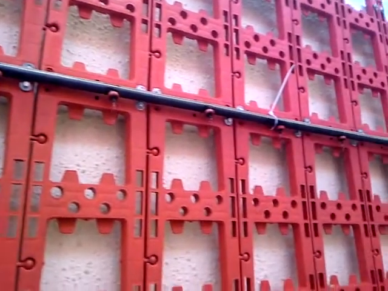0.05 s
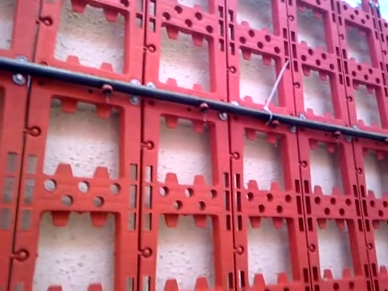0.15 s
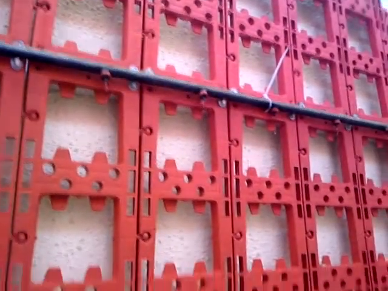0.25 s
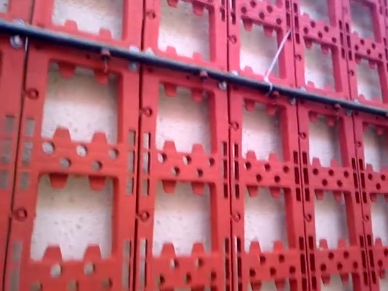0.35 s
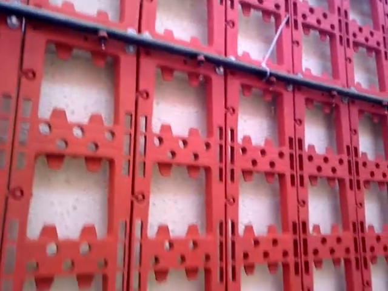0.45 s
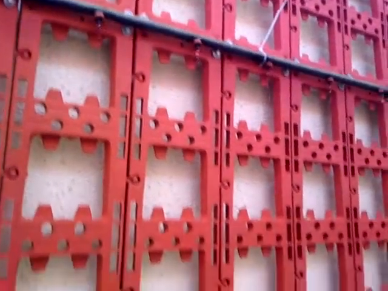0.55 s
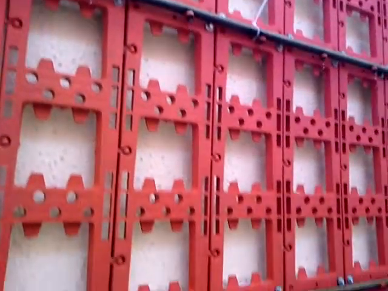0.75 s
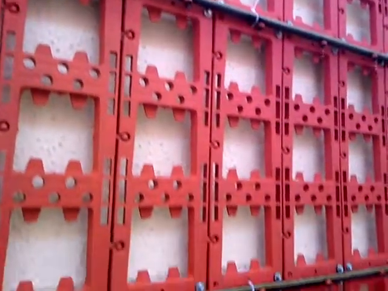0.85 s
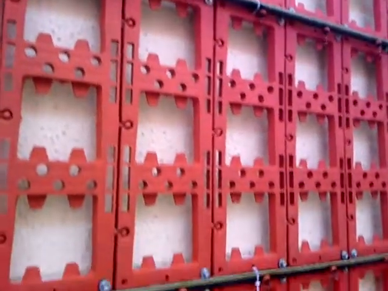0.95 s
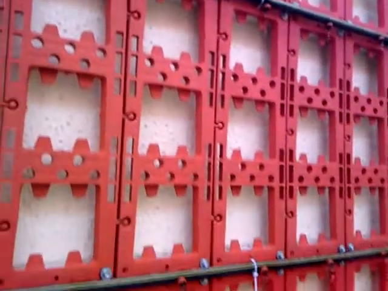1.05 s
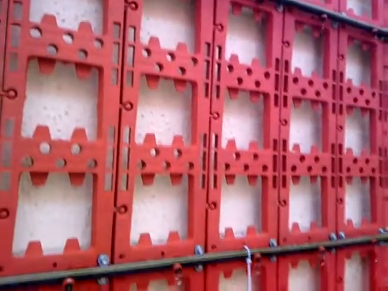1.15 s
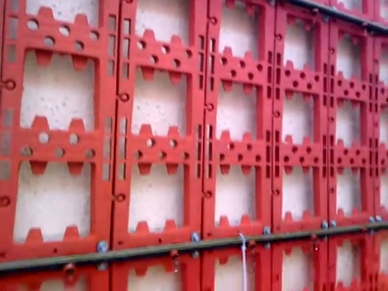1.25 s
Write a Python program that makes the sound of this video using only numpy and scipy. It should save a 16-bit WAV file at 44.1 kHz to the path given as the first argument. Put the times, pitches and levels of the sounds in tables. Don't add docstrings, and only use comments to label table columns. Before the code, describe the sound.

A shoe scrapes across gritty hollow boards from about 0.18 seconds, then heel and sole knock at 0.38 and 0.44, the boards ringing woodily and fading. Tiny dry plastic ticks snap throughout, the sharpest near 0.72. A second crunching drag starts around 0.95, peaks near 1.06 and fades. Faint water hiss and low yard murmur continue underneath, through a thin, dull-topped phone microphone.

```python
import sys
import numpy as np
from scipy import signal
from scipy.fft import rfft, irfft, next_fast_len
from scipy.io import wavfile
from scipy.ndimage import uniform_filter1d, map_coordinates

SR = 44100
rng = np.random.default_rng(int(sys.argv[2]) if len(sys.argv) > 2 else 0)


def output_pcm(signal):
    pcm = np.clip(np.atleast_2d(signal).T, -1, 1) * 32767
    wavfile.write(sys.argv[1], SR, np.round(pcm).astype(np.int16))


def to_linear_factor(level_db):
    exponent = np.asarray(level_db, float) / 20
    return 10 ** exponent


N = 57330

# time_s, level_db
HISS_LEVEL = [(0.0, -50.5), (0.39, -52.5), (0.488, -55), (0.85, -54), (1.172, -67), (1.3, -55.5)]
# freq_hz, density_db
HISS_SPECTRUM = [(880, -7.5), (1500, -8), (1690, -9), (3000, -5.5), (3800, -8), (7600, -6.5), (9880, -20.5),
                 (16700, -120)]
# freq_hz, density_db
YARD_SPECTRUM = [(30, -39.5), (120, -16), (200, -19), (280, -10), (420, -14), (700, -12), (1200, -16),
                 (3000, -27), (6000, -55)]
# time_s, level_db
YARD_LEVEL = [(0, -49), (.17, -49.5), (.62, -50), (.77, -48.5), (.85, -48.5), (.9, -50), (1.3, -49)]

# start_s, peak_db, pitch_hz, t60_s
TICKS = [(0.0561, -37.5, 6900, 0.027), (0.1903, -28.5, 6690, 0.0099), (0.585, -80, 7100, .02),
         (.619, -42, 6000, 0.022), (0.6592, -29, 4900, 0.02), (0.7153, -18, 5850, 0.0079),
         (0.7218, -28.5, 7450, 0.022), (0.738, -44, 6700, 0.037), (0.792, -41.5, 6400, 0.069),
         (0.9456, -31, 7080, 0.011), (1.011, -37.5, 7300, .02), (1.125, -41, 6960, 0.017),
         (1.131, -34.5, 7200, 0.014), (1.2177, -27, 6560, 0.0093), (1.2229, -35, 6700, 0.022),
         (1.228, -47, 6200, 0.026)]
# freq_hz, level_db, t60_share
PLASTIC_MODES = [(3000, -4, .5), (3570, -10, 0.41), (4300, -1.5, .7), (4840, 0, 0.7), (6200, -2, 0.74),
                 (6780, -4.5, 2.7), (7324, -0.5, 1.3), (8500, 2, .6)]
TICK_WIDTH_LOG_HZ, TICK_RISE_S = 0.34, 0.00014
CRACK_DB, TICK_TAIL_DB, TICK_TAIL_T60_S = -5, -15, 0.1

# time_s, weight_db, edge_scrape_db, grit_db
DRAGS = [
    [(.179, -86, -77, -68), (.184, -41, -36.5, -44), (.225, -45.5, -34, -44), (.25, -40, -42.5, -40),
     (.285, -39, -44.5, -41), (.365, -53, -45.5, -42), (.48, -45, -44, -45), (.6, -57.5, -56.5, -58)],
    [(.88, -52.5, -70, -90), (.957, -44, -60, -70), (.965, -39.5, -37.5, -47.5),
     (1.01, -39.5, -40.5, -44.5), (1.06, -33.5, -40.5, -41.5), (1.1, -42, -45.5, -42),
     (1.2, -53, -48.5, -46), (1.3, -54, -54.5, -50.5)],
]
# freq_hz, width_hz, level_db
BOARD_PEAKS = [(247, 120, -1.5), (320, 61, 5), (468, 35.5, -0.5)]
# freq_hz, width_hz, level_db
EDGE_PEAKS = [(597, 145, -1.5), (770, 89, 0.5), (810, 126, 0), (1167, 360, -6.5), (1507, 253, -4.5)]
# freq_hz, density_db
GRIT_SPECTRUM = [(500, -26.5), (1000, -2.5), (1900, -4.5), (2600, -7), (3400, -9.5), (5000, -10),
                 (7600, -15), (12000, -39)]
# center_s, half_length_s, level_db
RASPS = [
    (0.279, .04, -44.5),
    (1.063, 0.047, -50.5),
]
RASP_HZ, RASP_WIDTH_HZ = 2450, 1300
SLIPS_PER_S, SLIP_SPREAD_DB = 2500, 3
GRITS_PER_S, GRIT_SPREAD_DB = 9000, 1

# start_s, ring_db, held_s, held_gain_db, slap_db
KNOCKS = [
    (.3773, -26.5, 0.014, 5.5, 9.5),
    (0.4357, -22, 0.02, 6, -7.5),
]
# freq_hz, heel_db, sole_db, t60_s
HOLLOW_MODES = [(135.7, -22, -22, .6), (183.8, -6, -15, 0.6), (246.8, -2.5, -11.5, 0.8),
                (330.5, -2.5, -1.5, 0.29), (386, -15.5, -6.5, .5), (450.5, -3.5, -3, 0.64),
                (606, -12, -5.5, 0.15), (743, -10.5, -16.5, 0.39), (844, -17, -9.5, 0.075),
                (1044, -20.5, -20.5, 0.26), (1177, -14.5, -20, .07), (1465, -19.5, -22, 0.1)]
# freq_hz, level_db
SLAP_PARTIALS = [(700, -2.5), (980, 2.5), (1300, -3.5), (1550, -11.5)]
KNOCK_RISE_S, LIFT_S, STILL_S, WANDER_RAD = 0.0007, 0.0006, 0.2, 0.9
RATTLE_DB, RATTLE_T60_S, SLAP_T60_S = -7.5, 0.37, 0.014

# freq_hz, gain_db
TREBLE_RESPONSE = [(7500, 1.5), (7800, -4), (8010, -19), (8250, -5.5), (8700, -14), (9050, -26), (9250, -65)]
# freq_hz, chance
DROPOUT_CHANCE = [(2800, 0), (3500, .25), (5000, .35), (6000, .5), (7400, .6), (7700, .85)]
DROPOUT_START_S, DROPOUT_BLOCK_S, DROPOUT_BLOCKS, DROPOUT_BAND_HZ = 0.392, 0.008, 8, 300
CEILING = 0.25
RUMBLE_DB, RUMBLE_HZ = -46, 89


def unit(x):
    return x / np.sqrt(np.mean(x ** 2) + 1e-20)


def along(points, hz):
    f, v = np.transpose(points)
    return np.interp(np.log(hz + 1), np.log(f + 1), v)


def curves(rows, **ends):
    s, *cols = np.transpose(rows)
    return [np.interp(np.arange(N) / SR, s, c, **ends) for c in cols]


def wobble(rate_hz):
    knots = rng.standard_normal(int(N * rate_hz / SR) + 4)
    return map_coordinates(knots, [np.arange(N) * rate_hz / SR])


def filtered(x, response):
    m = next_fast_len(x.shape[-1] + 8192)
    spectrum = rfft(x, m) * response(np.fft.rfftfreq(m, 1 / SR))
    return irfft(spectrum, m)[..., :x.shape[-1]]


def resonances(peaks):
    def response(f):
        total = 0
        for k, (c, w, db) in enumerate(peaks):
            total = total + (-1) ** k * to_linear_factor(db) * 1j * f * w / (c * c - f * f + 1j * f * w)
        return total
    return response


def rush(spectrum, patchy_db):
    z = signal.stft(rng.standard_normal(N + 1024), nperseg=512)[2]
    field = uniform_filter1d(rng.standard_normal(z.shape), 6, 0)
    field = uniform_filter1d(field, 8, 1)
    x = signal.istft(z * to_linear_factor(patchy_db * unit(field)), nperseg=512)[1][:N]
    return unit(filtered(x, lambda hz: to_linear_factor(along(spectrum, hz))))


def grains(rate_hz, spread_db):
    hit, side, size = rng.random((3, N))
    return (hit < rate_hz / SR) * np.sign(side - 0.5) * to_linear_factor(-spread_db * np.log(size + 0.003))


def yard():
    level_db = curves(YARD_LEVEL)[0] + 2.3 * wobble(25)
    return to_linear_factor(level_db) * rush(YARD_SPECTRUM, patchy_db=2.0)


def water():
    level_db = curves(HISS_LEVEL)[0] - 0.72 + 0.46 * wobble(36)
    return to_linear_factor(level_db) * rush(HISS_SPECTRUM, patchy_db=1)


def ticks():
    out, t = np.zeros(N + SR), np.arange(SR // 8) / SR
    for start_s, peak_db, pitch_hz, t60_s in TICKS:
        def near_db(f):
            return -9 * (np.log(f / pitch_hz) / TICK_WIDTH_LOG_HZ) ** 2

        ring = 0
        for hz, db, share in PLASTIC_MODES:
            a, b, c = rng.standard_normal(3)
            level_db = db + near_db(hz) + 1.6 * a - 60 * t / (share * t60_s)
            ring = ring + to_linear_factor(level_db) * np.sin(2 * np.pi * hz * (1 + 0.012 * b) * t + 0.5 * c)
        noise = unit(filtered(rng.standard_normal(len(t)), lambda f: to_linear_factor(near_db(f + 1))))
        crack = to_linear_factor(CRACK_DB - 60 * t / t60_s)
        tail = to_linear_factor(TICK_TAIL_DB - 60 * t / TICK_TAIL_T60_S)
        rise = 1 - np.exp(-t / TICK_RISE_S)
        out[round(start_s * SR):][:len(t)] += to_linear_factor(peak_db - 7.5) * rise * (ring + noise * (crack + tail))
    return out[:N]


def drags():
    slips = grains(SLIPS_PER_S, SLIP_SPREAD_DB)
    wood = unit(filtered(slips, resonances(BOARD_PEAKS)))
    edge = unit(filtered(slips, resonances(EDGE_PEAKS)))
    sand = grains(GRITS_PER_S, GRIT_SPREAD_DB)
    grit = unit(filtered(sand, lambda hz: to_linear_factor(along(GRIT_SPECTRUM, hz))))
    band = resonances([(RASP_HZ, RASP_WIDTH_HZ, 0)])
    rasp = unit(filtered(grains(GRITS_PER_S, GRIT_SPREAD_DB), lambda hz: band(hz) ** 2))

    strokes = np.array([to_linear_factor(curves(rows, left=-120, right=-120)) for rows in DRAGS])
    weight, scrape, crunch = strokes.sum(axis=0)
    t = np.arange(N) / SR
    speed = sum(to_linear_factor(db - 6 * ((t - s) / half_s) ** 2) for s, half_s, db in RASPS)
    rubbing = to_linear_factor(0.79 * wobble(90)) * (weight * wood + scrape * edge)
    return rubbing + to_linear_factor(0.8 * wobble(40)) * (crunch * grit + speed * rasp)


def knocks():
    out, t = np.zeros(N + SR), np.arange(SR // 2) / SR
    for k, (start_s, ring_db, held_s, held_db, slap_db) in enumerate(KNOCKS):
        ring = 0
        for j, mode in enumerate(HOLLOW_MODES):
            hz, mode_db, t60_s = mode[0], mode[1 + k], mode[3]
            drift_rad = WANDER_RAD * np.minimum(t / 0.03, 1) * wobble(35)[:len(t)]
            decay = to_linear_factor(mode_db - 60 * np.maximum(t - held_s / 2, 0) / t60_s)
            ring = ring + (-1) ** j * decay * np.sin(2 * np.pi * hz * t + drift_rad)

        body = resonances([(mode[0], 40, mode[1 + k]) for mode in HOLLOW_MODES])
        rattle = unit(filtered(rng.standard_normal(len(t)), body))
        rattle = to_linear_factor(RATTLE_DB - 60 * t / RATTLE_T60_S) * rattle
        slap = sum(to_linear_factor(db) * np.sin(2 * np.pi * hz * t) for hz, db in SLAP_PARTIALS)
        slap = to_linear_factor(slap_db - 60 * t / SLAP_T60_S) * slap

        lift = 1 + np.exp(np.clip((t - held_s) / LIFT_S, -50, 50))
        pressed = to_linear_factor(held_db / lift - 35 * (t / STILL_S) ** 3)
        rise = 1 - np.exp(-t / KNOCK_RISE_S)
        out[round(start_s * SR):][:len(t)] += to_linear_factor(ring_db) * rise * (pressed * (ring + rattle) + slap)
    return out[:N]


def scene():
    return (yard() + water() + ticks() + drags() + knocks())[None]


def dropouts(x):
    hz, t, z = signal.stft(x, SR, nperseg=512, noverlap=448)
    block = np.floor((t - DROPOUT_START_S) / DROPOUT_BLOCK_S).astype(int)
    luck = (rng.random((80, 4)).argsort(axis=1) + rng.random((80, 1))) / 4
    luck = np.repeat(luck, 2, axis=1)[(hz / DROPOUT_BAND_HZ).astype(int)]
    luck = luck[:, np.clip(block, 0, DROPOUT_BLOCKS - 1)]
    active = (block >= 0) & (block < DROPOUT_BLOCKS)
    lost = (luck < along(DROPOUT_CHANCE, hz)[:, None]) & active
    return signal.istft(z * ~lost, SR, nperseg=512, noverlap=448)[1][..., :N]


def roll_off(x):
    return signal.sosfilt(signal.butter(12, 9060, fs=SR, output="sos"), x)


def record(dry):
    def mic(hz):
        return (1j * hz / (170 + 1j * hz)) ** 3 * to_linear_factor(along(TREBLE_RESPONSE, hz))

    x = filtered(dry, mic)
    x = x / (1 + np.abs(x / CEILING) ** 4) ** (1 / 4)
    x = filtered(x, lambda hz: (1j * hz / (90 + 1j * hz)) ** 2)
    x = dropouts(x)
    level = np.sqrt(np.abs(uniform_filter1d(x ** 2, size=2800, axis=1)))
    rumble = unit(filtered(rng.standard_normal(N), lambda hz: 1 / (1 + (hz / RUMBLE_HZ) ** 4)))
    return roll_off(x + to_linear_factor(RUMBLE_DB) * level * rumble)


dry = scene()
out = record(dry)
output_pcm(out)
```